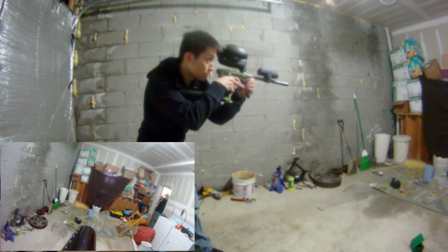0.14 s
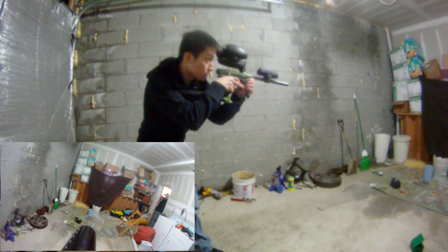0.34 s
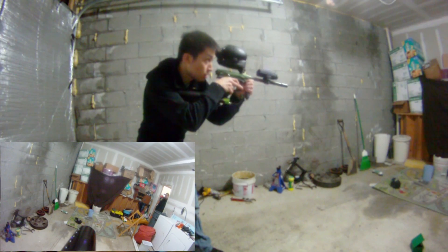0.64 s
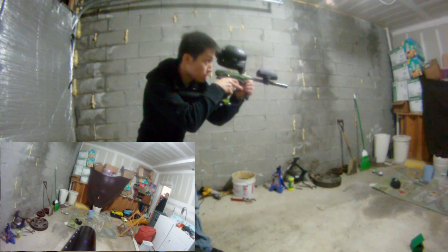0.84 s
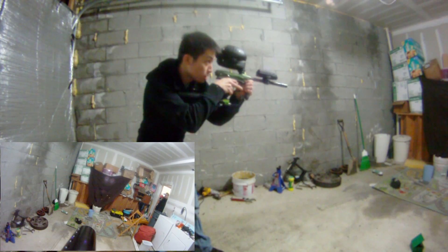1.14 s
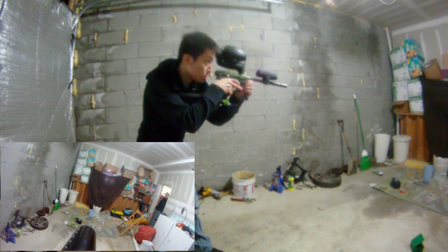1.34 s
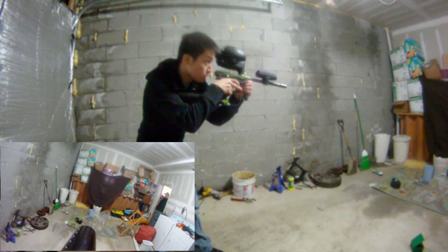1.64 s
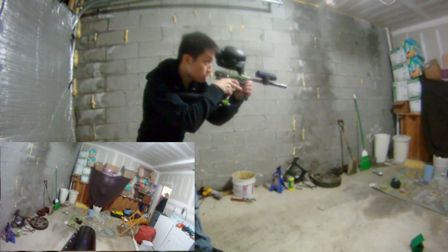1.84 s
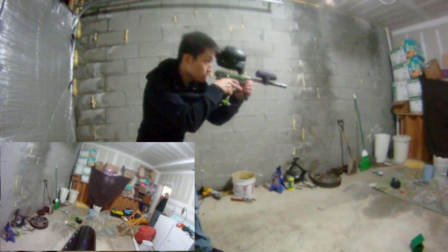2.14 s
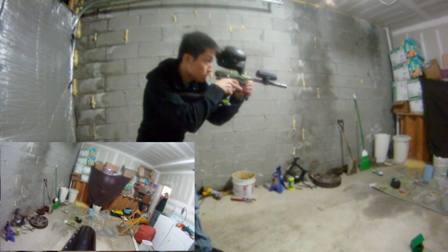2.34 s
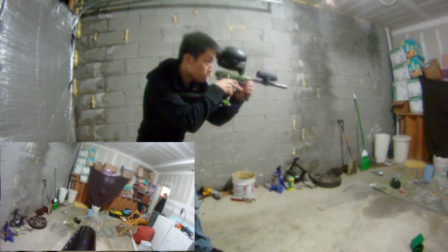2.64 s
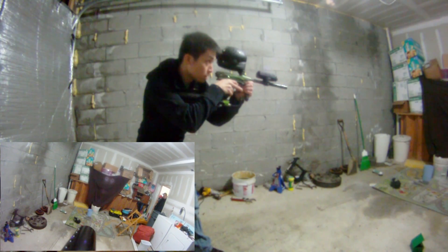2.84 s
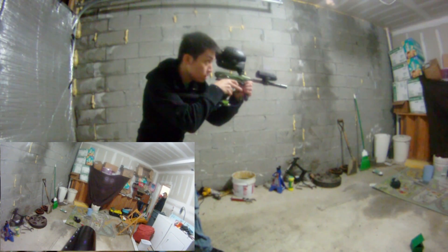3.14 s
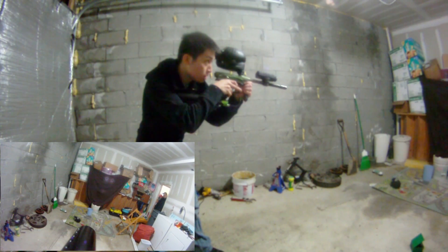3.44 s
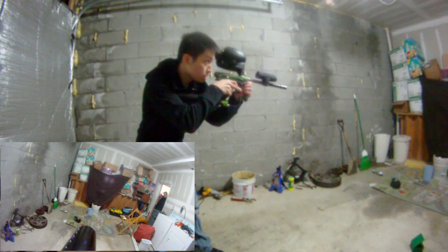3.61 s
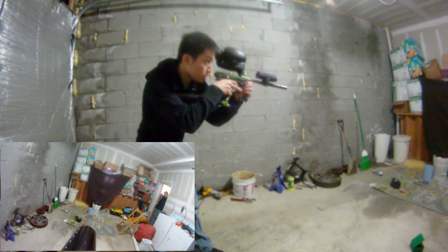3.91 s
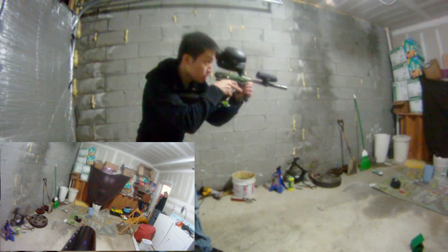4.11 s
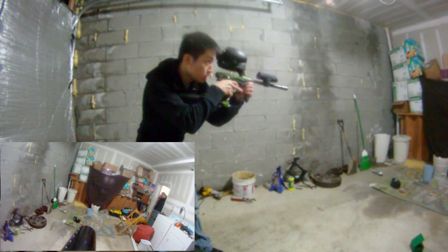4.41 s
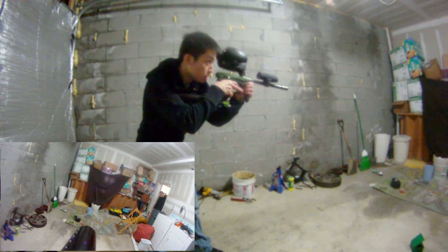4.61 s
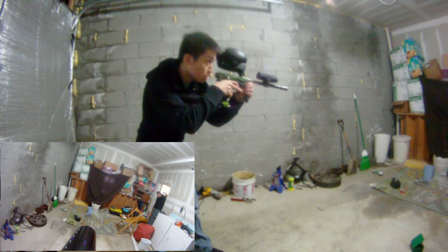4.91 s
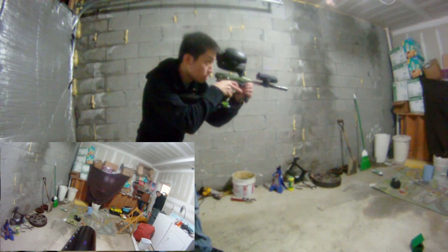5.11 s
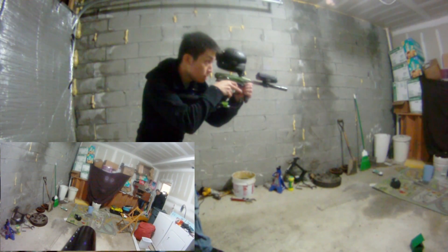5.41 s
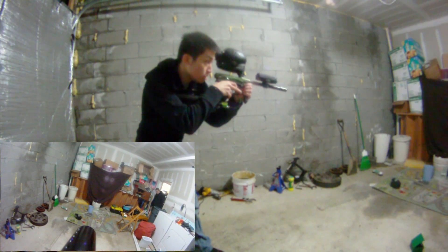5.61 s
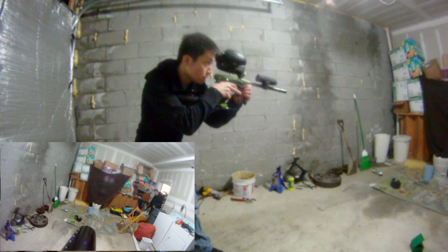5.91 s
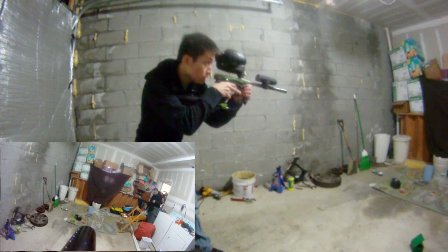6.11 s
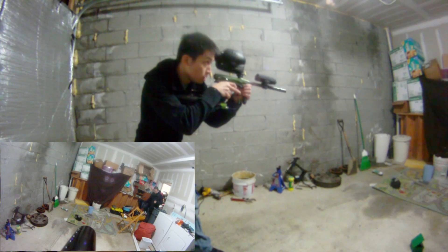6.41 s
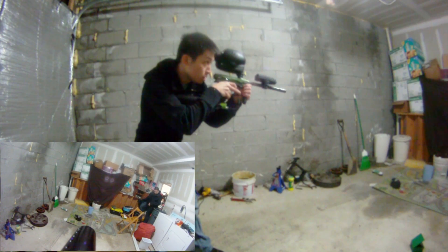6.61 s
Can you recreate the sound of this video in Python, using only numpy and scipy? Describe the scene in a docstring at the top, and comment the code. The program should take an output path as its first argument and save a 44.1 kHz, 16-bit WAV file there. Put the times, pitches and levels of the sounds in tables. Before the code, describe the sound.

In a hard-walled garage, four loud, crisp pops come at an unhurried, even pace from a paintball marker a few metres away. The bolt's metallic clack, the air blast and the ball smacking a backstop merge into one bang that echoes briefly. Soft, slightly hollow knocks of falling balls follow the first three shots. The background is quiet, with faint microphone hiss and electrical hum.

```python
"""In a block-walled garage, a paintball marker fires four single shots a few metres away.
Each shot: a faint hiss swells, the bolt strikes and rings the metal body, air blasts from the muzzle,
and the ball slaps a hanging backstop. The walls echo every bang. Spent balls knock on the floor.
Underneath lie a faint swelling rush, microphone hiss and mains hum."""
import sys
import numpy as np
from scipy import signal
from scipy.fft import rfft, irfft, next_fast_len
from scipy.io import wavfile
from scipy.ndimage import uniform_filter1d, minimum_filter1d, map_coordinates

SR = 44100
rng = np.random.default_rng(int(sys.argv[2]) if len(sys.argv) > 2 else 0)


def store_pcm(level_fs):
    """Save levels as 16-bit WAV."""
    pcm = np.round(np.clip(level_fs, -1, 1) * 32767).astype(np.int16)
    wavfile.write(sys.argv[1], SR, np.atleast_2d(pcm).T)


N = 297675  # 6.75 seconds

# One row a shot: strike_s, wait_for_blast_s, ball_flight_s, blast_db, slap_db, slap_bass_db
SHOTS = [(1.1692, .0257, .0528, 19.5, 19.5, 8.5), (2.9555, .0249, .0526, 20, 19.5, 6),
         (4.6544, .0246, .0519, 19.5, 18.5, 1), (6.1962, .0261, .0544, 18, 15.5, -2.5)]
# Notes of the marker's metal body: pitch_hz, level_db, fade_s (a fade is a drop of 60 dB)
BODY_NOTES = [(910, -19.5, 0.039), (1437, -26, 0.13), (1587, -27, 0.082), (4830, -24, .03),
              (5625, -16.5, 0.0056)]
def marker():
    """The bolt strikes, air drives the ball out, the ball lands. Strike and blast ring the body."""
    strike_s, wait_s, flight_s, blast_db, slap_db, bass_db = np.transpose(SHOTS)
    blast_s = strike_s + wait_s
    bolt = sum(map(bolt_strike, strike_s))
    blows = [(s, 3.5) for s in strike_s] + [(s, 6.5) for s in blast_s]  # start_s, strength_db
    body = ringing(blows, BODY_NOTES)
    blast = sum(map(muzzle_blast, blast_s, blast_db))
    slap = sum(map(backstop_slap, blast_s + flight_s, slap_db, bass_db))
    return bolt + body + blast + slap + hiss_before_shots(strike_s)

# First echoes of the bolt off the walls: delay_s, level_db
BOLT_ECHOES = [(.002, -4), (.0075, 1), (.011, -6)]
# Tone of the bolt: pitch_hz, level_db
BOLT_TONE = [(150, -15), (350, -9), (800, -1), (950, 0.5), (1100, -5), (1550, 0), (2100, -7.5),
             (5500, -2.5), (9000, 4)]
def bolt_strike(start_s):
    """The bolt slams forward with a sharp clack, equally hard every time."""
    clack = bang(start_s, 13.5, BOLT_ECHOES, fade_s=.006, room_db=11, rise_s=.012, early_db=0)
    return shape_pair(clack, BOLT_TONE)

# First echoes of the blast: delay_s, level_db
BLAST_ECHOES = [(.003, -1), (.0047, 2), (.009, 0), (.026, 0)]
# Tone of the blast: pitch_hz, level_db
BLAST_TONE = [(100, -9), (280, 1), (490, 1.5), (650, -3), (1500, -1), (3000, 0.62), (5500, 0.5), (9000, 1)]
def muzzle_blast(start_s, level_db):
    """Compressed air bursts out of the barrel with a very short pop."""
    pop = bang(start_s, level_db, BLAST_ECHOES, fade_s=.0041, room_db=14, rise_s=.006, early_db=-.5)
    return shape_pair(pop, BLAST_TONE)

# First echoes of the slap: delay_s, level_db
SLAP_ECHOES = [(.004, 0), (.012, 0), (.039, -1)]
# Tone of the slap above its bass: pitch_hz, level_db
SLAP_TONE = [(900, 3), (1500, 1.5), (3000, -3), (5500, -6.5), (9000, -5.5)]
def backstop_slap(start_s, level_db, bass_db):
    """The ball smacks the hanging backstop, with its own amount of low thud."""
    slap = bang(start_s, level_db, SLAP_ECHOES, fade_s=.015, room_db=11.5, rise_s=.003, early_db=4.5)
    return shape_pair(slap, [(400, bass_db)] + SLAP_TONE)

# Tone of the hiss before a shot: pitch_hz, level_db
SWELL_TONE = [(100, -15), (500, -3.5), (1500, -5.5), (3500, 2.5), (5400, -4), (9000, 10.5)]
def hiss_before_shots(strike_s, length_s=.038, gain_db=-29.5):
    """A faint hiss swells just before each strike and stops as it lands."""
    t = np.arange(N) / SR
    swell = sum(np.clip(1 - (s - t) / length_s, 0, 1) * (t < s) for s in strike_s)
    return amp(gain_db) * swell * shape_pair(rng.standard_normal((2, N)), SWELL_TONE)

# Spent balls dropping: start_s, level_db, middle_db, treble_db
KNOCKS = [(1.718, -22.5, 6.5, -31), (1.73, -17, 4, -19), (1.769, -21, 8, -7), (1.782, -12, -21, -23),
          (1.885, -30, -14, -25), (2.03, -28, -23, -22), (2.62, -48.5, 0, -7), (3.7, -27.5, -10, -27.5),
          (3.73, -33, -21.5, -24.5), (5.375, -34.5, -5, -13), (5.387, -24.5, -6.5, -22.5),
          (5.63, -40.5, -9.5, -10.5)]
# First echo of a knock: delay_s, level_db
KNOCK_ECHOES = [(.006, -3)]
# Low part of a knock's tone: pitch_hz, level_db
KNOCK_TONE = [(100, -10), (260, 3.5), (520, 1), (750, 6.5)]
# Notes of a low hollow ring that each knock sets off: pitch_hz, level_db, fade_s
HOLLOW_NOTES = [(498, -31.5, 0.3), (574, -20.5, 0.069)]
def floor_knocks(ring_db=4):
    """Soft balls land far off, heard mostly as echo. A harder hit sounds brighter."""
    total = ringing([(s, db + ring_db) for s, db, _, _ in KNOCKS], HOLLOW_NOTES)[0]
    for start_s, level_db, middle_db, treble_db in KNOCKS:
        tone = KNOCK_TONE + [(1000, middle_db), (1800, middle_db), (2800, treble_db), (9000, treble_db)]
        knock = bang(start_s, level_db, KNOCK_ECHOES, fade_s=.1, room_db=15.5, rise_s=.0018, early_db=-.5)
        total += shape(knock[0], tone)
    return total

def bang(start_s, level_db, echoes, fade_s, room_db, rise_s, early_db):
    """A click and a puff of noise, with echoes. Two rows: centre and side (left minus right)."""
    t = np.arange(SR // 8) / SR
    heard = amp(room_db) * np.array([garage_echo(rise_s, early_db) for _ in range(2)])
    for delay_s, echo_db in [(.001, 0)] + echoes:  # the direct sound comes first
        puff = .5 * amp(-60 * t / fade_s) * rng.standard_normal(len(t))  # rough walls vary each echo
        puff[0] = 1  # the click
        heard[0, round(delay_s * SR):][:len(t)] += amp(echo_db) * puff / np.linalg.norm(puff)
    out = np.zeros((2, N + SR))
    out[:, round(start_s * SR):][:, :heard.shape[1]] = amp(level_db) * heard
    return out[:, :N]

def ringing(blows, notes):
    """Each blow rings an object's notes in a slightly new mix, in the centre row only."""
    t = np.arange(SR // 4) / SR
    out = np.zeros((2, N + SR))
    for start_s, strength_db in blows:
        for pitch_hz, level_db, fade_s in notes:
            fade = amp(strength_db + level_db + rng.normal(0, 1.9) - 60 * t / fade_s)
            out[0, round(start_s * SR):][:len(t)] += fade * np.sin(2 * np.pi * pitch_hz * t)
    return out[:, :N]

# How long each pitch lingers in the garage: pitch_hz, fade_s
GARAGE_FADES = [(120, 0.4), (250, 0.4), (500, 0.37), (1400, 0.4), (3000, 0.36), (5500, 0.34), (9000, .25)]
def garage_echo(rise_s, early_db):
    """Many echoes blur into a wash that builds up, comes in clumps and dies away."""
    hz, frame_s, noise = signal.stft(rng.standard_normal(SR // 2), SR, nperseg=256)
    clumps = uniform_filter1d(uniform_filter1d(rng.standard_normal(noise.shape), 9, 0), 2, 1)
    fade_db = 1.6 * unit_level(clumps) - 60 * frame_s / at_pitch(GARAGE_FADES, hz)[:, None]
    wash = signal.istft(noise * amp(fade_db), SR, nperseg=256)[1][:SR // 2]
    t = np.arange(len(wash)) / SR
    wash *= (1 - np.exp(-t / rise_s)) * amp(early_db * np.exp(-t / .025))
    return wash / np.linalg.norm(wash)

# Loudness of the rush's low and high parts: time_s, level_db
RUSH_LOW_LEVELS = [(0, -79.5), (4.4, -72), (5.05, -64.5), (5.9, -62), (6.75, -55.5)]
RUSH_HIGH_LEVELS = [(0, -70), (.4, -79), (3.5, -82), (3.95, -69), (4.4, -81.5), (5.2, -62.5), (5.4, -75.5),
                    (5.8, -62.5), (5.95, -69), (6.55, -58.5), (6.65, -60), (6.75, -53.5)]
# Tones of those two parts: pitch_hz, level_db
RUSH_LOW_TONE = [(200, -29.5), (500, 4), (1400, 1.5), (2200, -5), (4000, -23)]
RUSH_HIGH_TONE = [(1500, -27.5), (3000, -3.5), (5000, 2), (7000, -3.5), (10000, -16)]
def far_rush():
    """A far rushing noise: its low part grows while its high part swells and sinks."""
    t = np.arange(N) / SR
    total = np.zeros(N)
    for levels, tone in [(RUSH_LOW_LEVELS, RUSH_LOW_TONE), (RUSH_HIGH_LEVELS, RUSH_HIGH_TONE)]:
        level_db = np.interp(t, *np.transpose(levels)) + wobble(24)
        noise = shape(rng.standard_normal(N), tone)
        total += amp(level_db) * unit_level(through_housing(noise))
    return total

# Tone of the microphone's hiss: pitch_hz, level_db
HISS_TONE = [(30, -37), (100, -20.5), (250, -14), (500, -11), (1300, -8.5), (2300, -6.5), (3200, -11.5),
             (5330, -12), (8000, -14), (10600, -17.5)]
# Notes of the hum: multiple_of_mains, level_db
HUM_NOTES = [(1, -83.5), (3, -84.5), (4, -92), (5, -79.5), (6, -95.5), (7, -80.5), (9, -83), (11, -85.5),
             (21, -86)]
def hiss_and_hum(hiss_db=-61.5, mains_hz=60):
    """The microphone's amplifier hisses, and mains power hums, mostly at odd multiples of its pitch."""
    t = np.arange(N) / SR
    hum = np.zeros(N)
    for multiple, level_db in HUM_NOTES:
        peak = np.sqrt(2) * amp(level_db + .6 * wobble(9.2))
        hum += peak * np.sin(2 * np.pi * (multiple * mains_hz * t + rng.random()))
    return hum + amp(hiss_db) * unit_level(shape(rng.standard_normal(N), HISS_TONE))

# What gets through the microphone's housing: pitch_hz, gain_db
HOUSING_TONE = [(40, -59.5), (85, -62), (190, -21.5), (390, -13), (480, -7.5), (640, -11.5), (930, -3.5),
                (1080, -6.5), (1480, 0.5), (2200, -13), (2650, -6), (3700, -8), (4600, -4), (5400, -3.5),
                (7200, -17), (10600, -29)]
def through_housing(sound):
    """The microphone sits behind a small opening that thins out the bass and the highest treble."""
    return shape(sound, HOUSING_TONE)

# How much of the shots' side row is heard: pitch_hz, gain_db
SIDE_TONE = [(60, -16.5), (170, -10.5), (470, -22.5), (1300, -25.5), (3630, -19.5), (10100, -15)]
def to_stereo(centre, side, right_db=.5):
    """Turn centre and side into left and right, leaning a little to the right."""
    side = shape(side, SIDE_TONE)
    return np.array([centre + side, centre - side]) * amp([[-right_db / 2], [right_db / 2]])

def amp(db):
    """Turn decibels into a number to multiply by."""
    return 10 ** (np.asarray(db) / 20)

def unit_level(x):
    """Scale a signal to an average power of 1."""
    return x / np.sqrt(np.mean(x ** 2) + 1e-20)

def at_pitch(table, hz):
    """Read between the rows of a table, giving each octave equal space."""
    pitches, values = np.transpose(table)
    return np.interp(np.log(hz + 1), np.log(pitches + 1), values)

def shape(sound, tone, size=4096):
    """Make each pitch louder or softer, as a tone table says."""
    gains = amp(at_pitch(tone, np.fft.rfftfreq(size, 1 / SR)))
    folded = irfft(np.log(gains + 1e-6))
    folded[1:size // 2] *= 2  # fold in half so the filter never rings ahead of a hit
    folded[size // 2 + 1:] = 0
    click_response = irfft(np.exp(rfft(folded)))
    return signal.oaconvolve(sound, click_response)[:len(sound)]

def shape_pair(pair, tone):
    """Give both rows the same tone."""
    return np.array([shape(row, tone) for row in pair])

def wobble(rate_hz):
    """A smooth curve through rate_hz random points a second."""
    points = rng.standard_normal(int(N * rate_hz / SR) + 4)
    return map_coordinates(points, [np.arange(N) * rate_hz / SR])

def scene():
    """The shots in stereo, with the knocks and the background in the centre."""
    centre, side = map(through_housing, marker())
    return to_stereo(centre, side) + through_housing(floor_knocks()) + far_rush() + hiss_and_hum()

def record(dry, ceiling=.95, top_hz=10700):
    """A fast limiter turns down the loudest peaks; then everything above top_hz is cut."""
    needed = np.minimum(1, ceiling / (np.abs(dry).max(axis=0) + 1e-9))
    gain = uniform_filter1d(minimum_filter1d(needed, size=45), size=45)  # smoothed over about 1 ms
    size = next_fast_len(N + 8192)
    passes = np.fft.rfftfreq(size, 1 / SR) < top_hz
    return irfft(rfft(dry * gain, size) * passes, size)[:, :N]

dry = scene()
out = record(dry)
store_pcm(out)
```